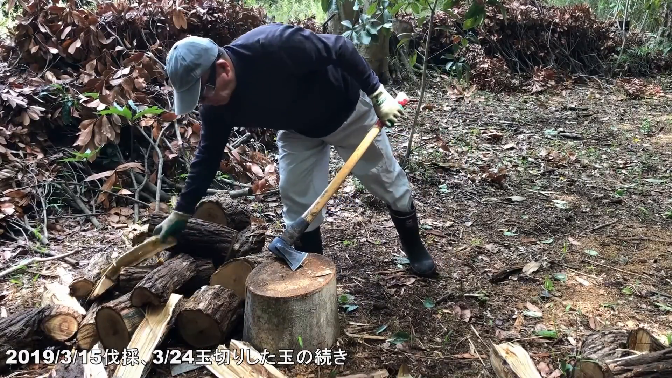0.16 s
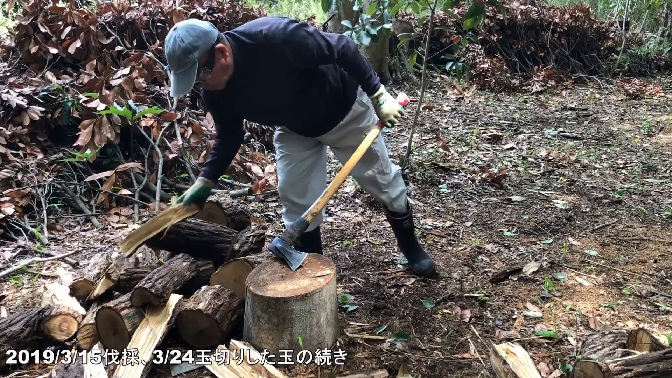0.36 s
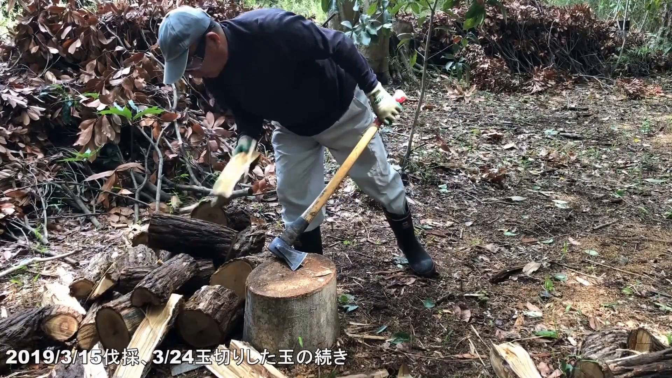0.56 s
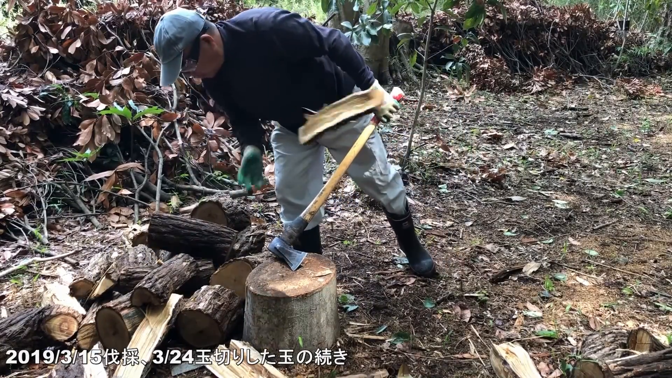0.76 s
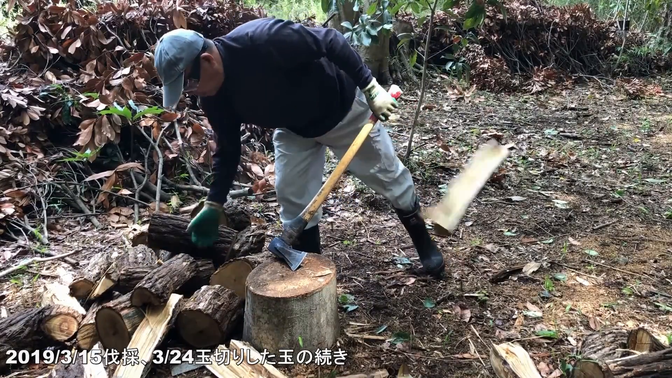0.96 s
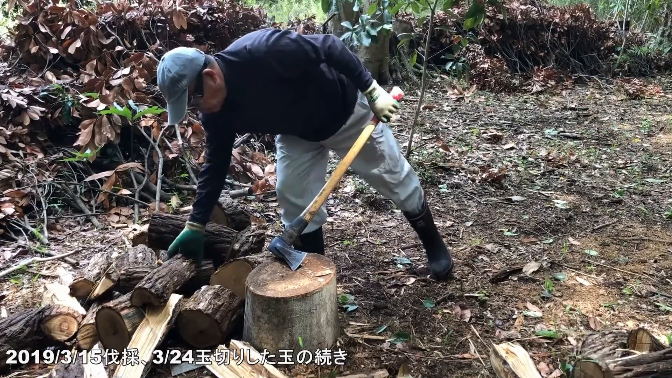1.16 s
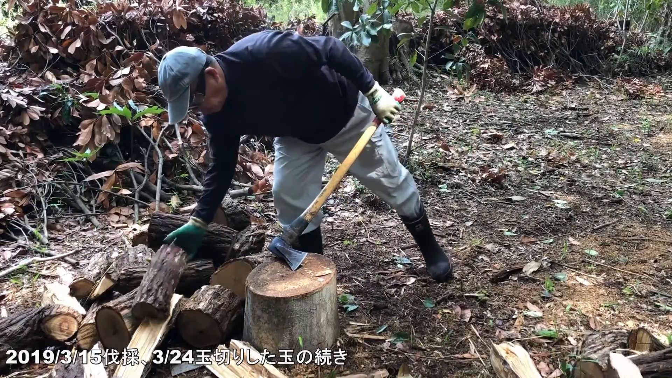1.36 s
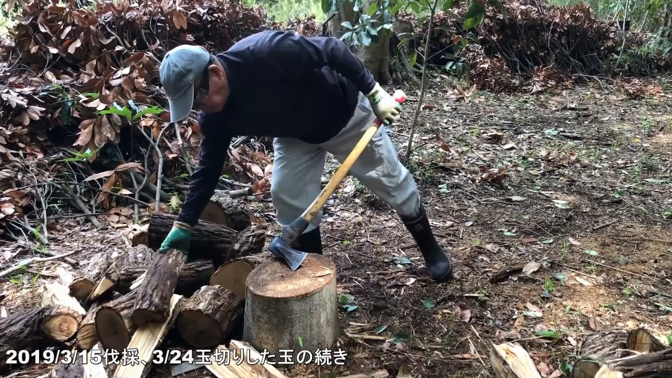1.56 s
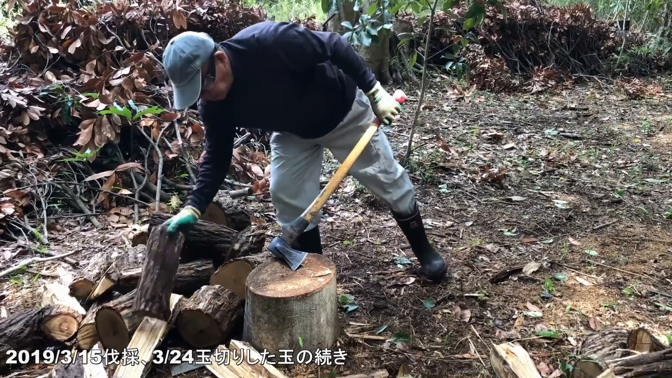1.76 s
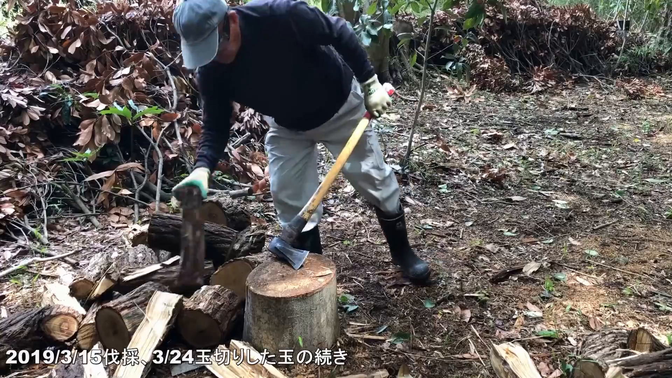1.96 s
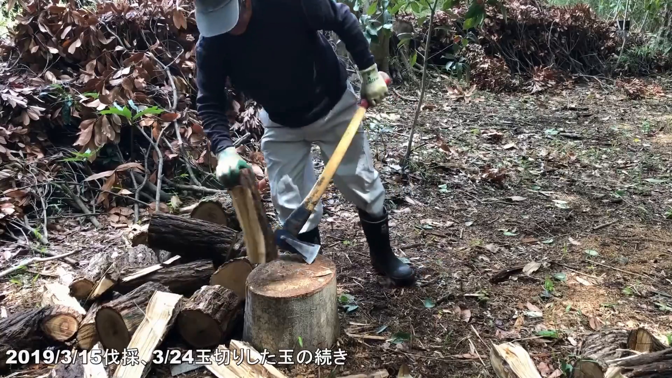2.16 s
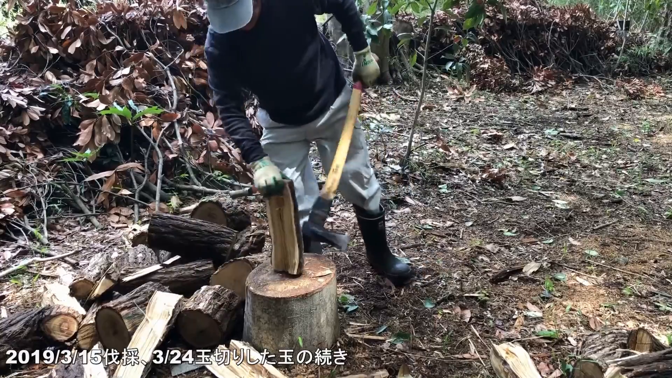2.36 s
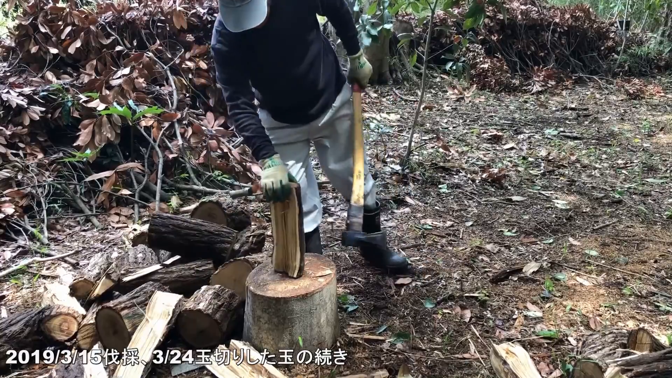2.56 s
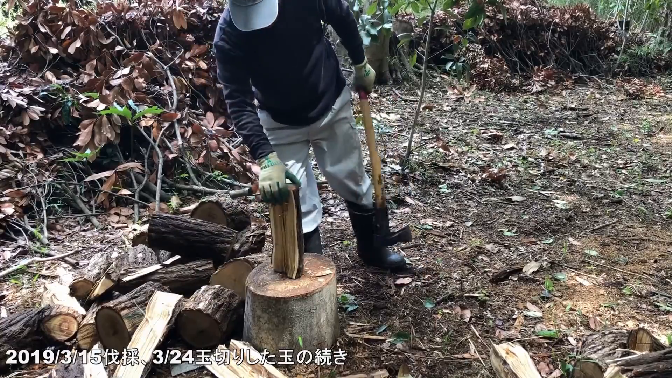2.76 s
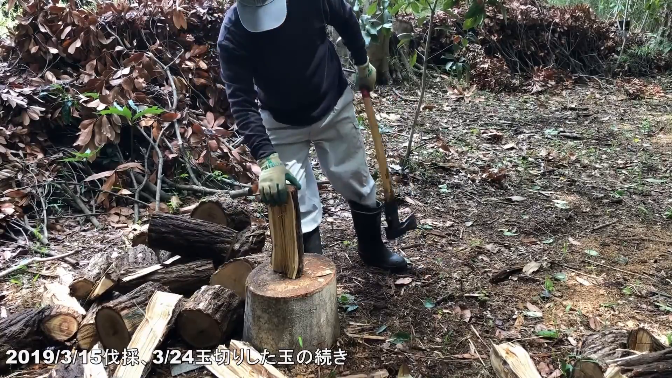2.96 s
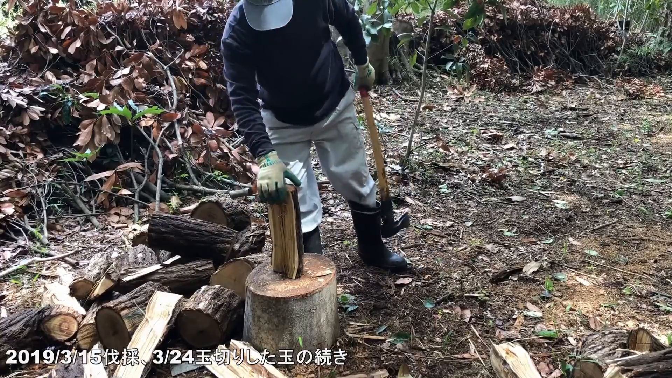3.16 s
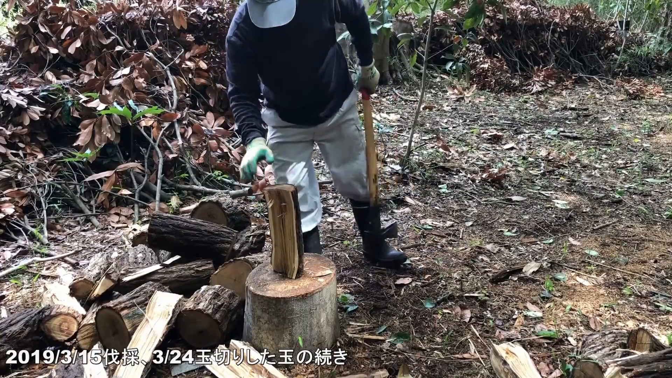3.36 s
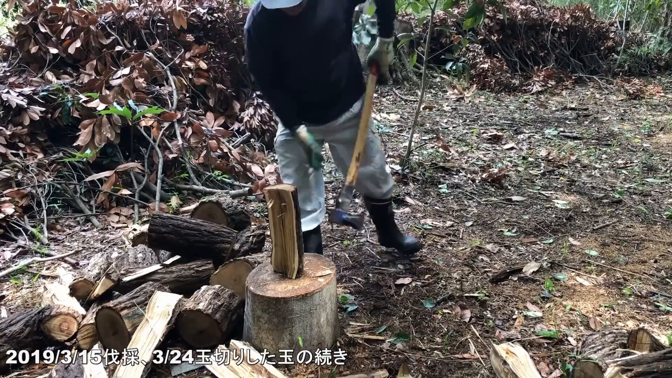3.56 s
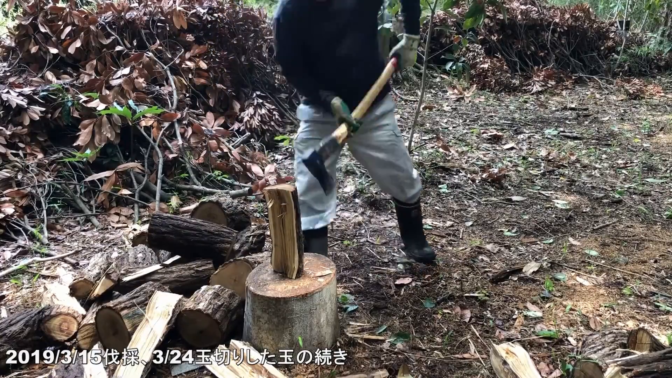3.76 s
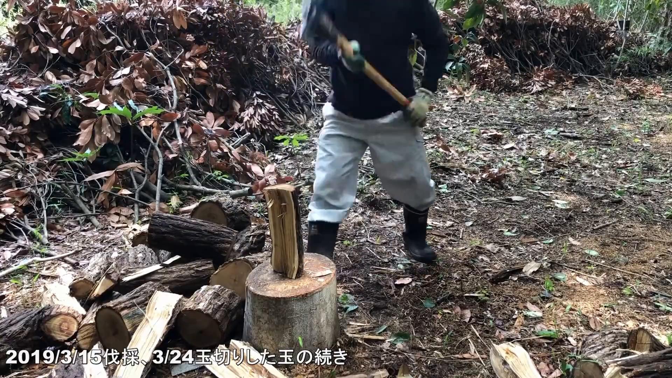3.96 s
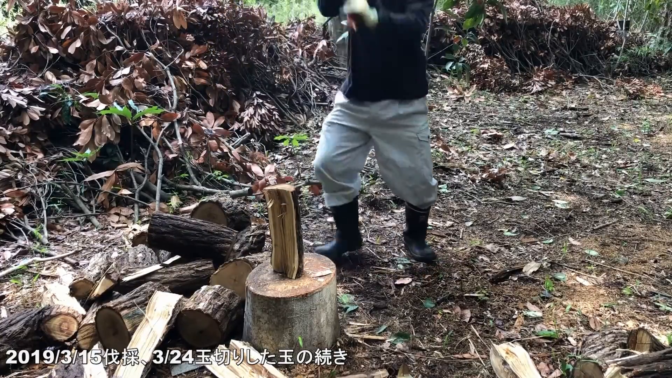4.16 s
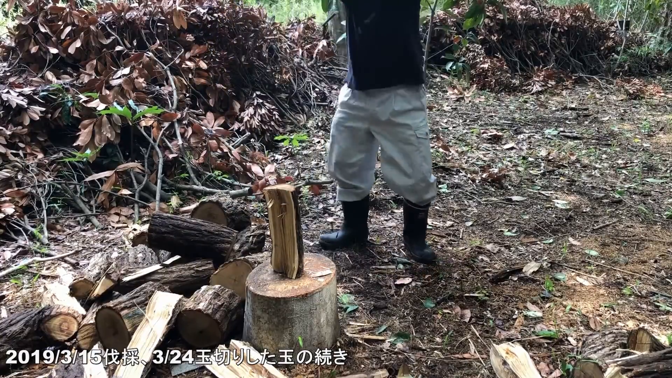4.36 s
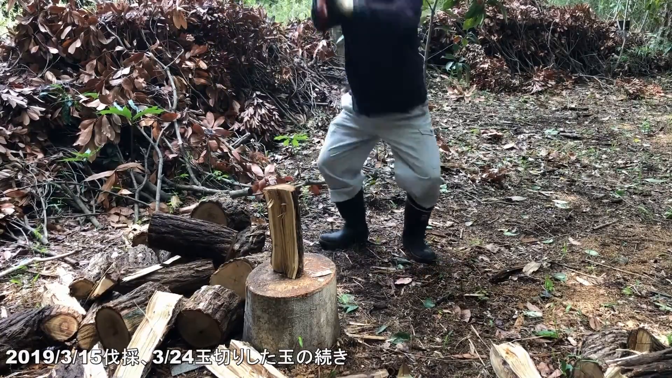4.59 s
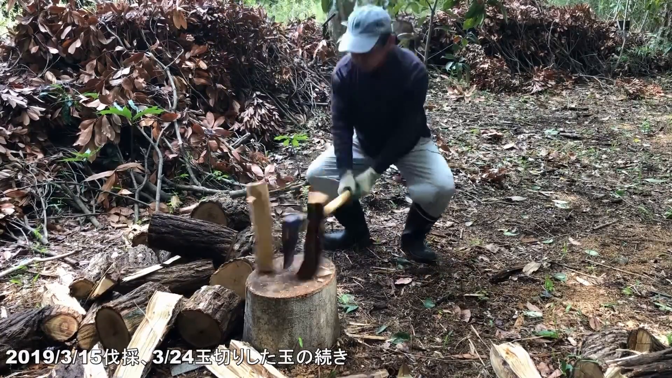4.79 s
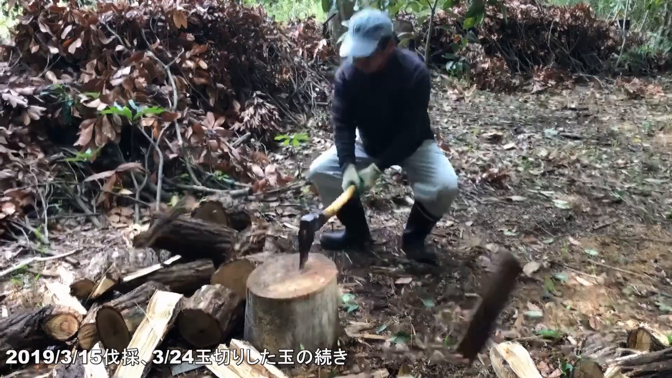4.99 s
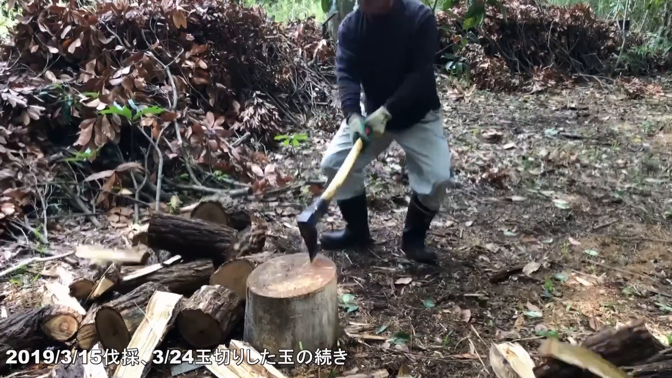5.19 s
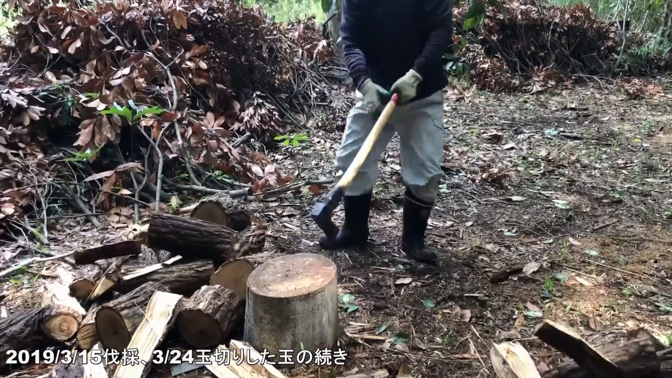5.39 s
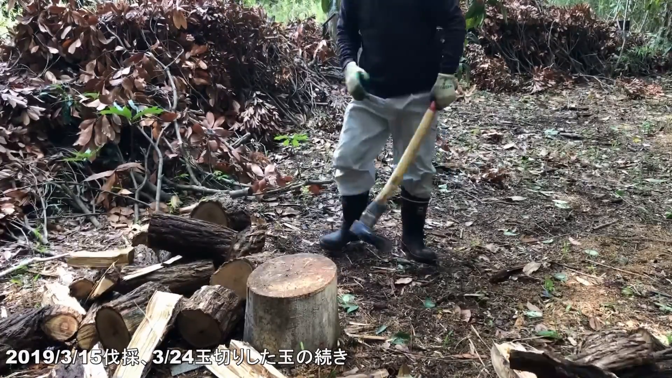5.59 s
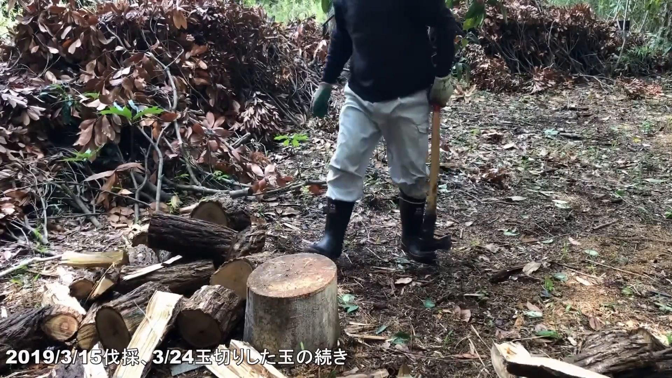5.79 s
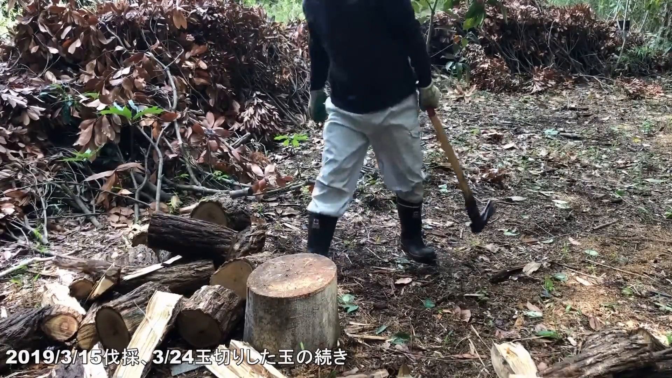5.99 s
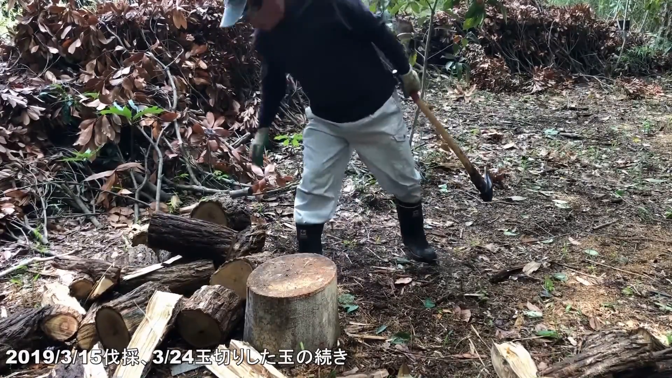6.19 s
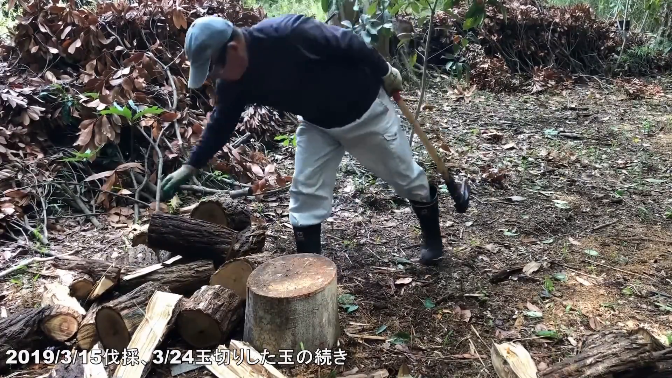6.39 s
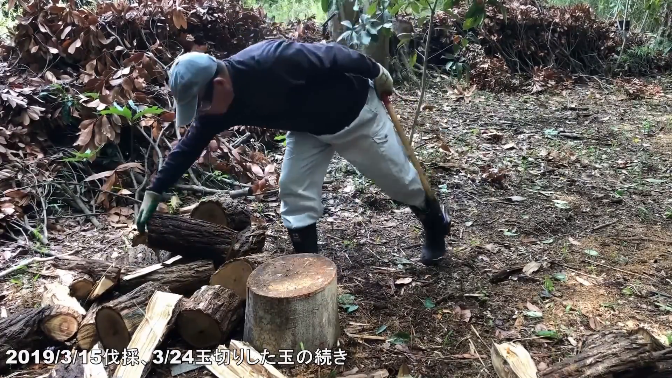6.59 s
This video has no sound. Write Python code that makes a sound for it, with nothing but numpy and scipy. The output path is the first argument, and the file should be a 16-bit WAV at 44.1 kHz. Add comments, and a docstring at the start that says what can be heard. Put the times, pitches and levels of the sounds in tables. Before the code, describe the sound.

Firewood splitting at a wood's edge: wooden clack, quiet handling, a sharp heavy chop with block thump, tumbling pieces, faint birds and engine drone.

```python
"""Firewood at the edge of a wood, a few metres from a phone's microphone. Early on, a tossed billet rings on the pile;
steel rings softly as the axe is pulled from the block, a log is dragged out and stood up, boots rustle in dry leaves.
Near 4.9 s one blow cracks into the end grain, tears fibres and thumps the block; the halves clatter down.
Wood is decaying modes, cracks and clacks are noise in resonances, leaves are filtered snaps and hiss.
Throughout, trees scatter the sound as shaped noise, birds call thinly, and a far engine swells after a slight dip."""
import sys
import numpy as np
from scipy import signal
from scipy.fft import rfft, irfft, next_fast_len
from scipy.io import wavfile
from scipy.ndimage import uniform_filter1d

SR = 44100
rng = np.random.default_rng(int(sys.argv[2]) if len(sys.argv) > 2 else 0)


def file_out(sig):
    """Save sig as 16-bit WAV at sys.argv[1]."""
    # one column per channel
    cols = np.atleast_2d(sig).T
    # limit, then scale
    lim = np.clip(cols, -1, 1)
    pcm = np.round(lim * 32767).astype(np.int16)
    wavfile.write(sys.argv[1], SR, pcm)


N = 292824
TIME = np.arange(N) / SR  # the whole scene [s]
AGE = TIME[:SR // 2]  # time since an event began [s]
TOP_HZ = 16200  # upper limit of the microphone

# ringing of the split log on the block: (frequency [Hz], relative level [dB], t60 [s])
LOG_MODES = [(343, -4, .05), (549, -3.5, 0.025), (856, -11.5, 0.12), (1328, -29.5, 0.35),
             (1197, -11.5, .06), (1275, -7, 0.048), (1340, -5, 0.033), (1781, -3.5, 0.029),
             (1990, -13.5, 0.037), (2690, -11, 0.051), (3230, -6.5, 0.032), (3830, -11, 0.055)]
# blows on the log: (time [s], level [dB], contact corner [Hz], higher is harder)
LOG_BLOWS = [(4.9231, -25, 4030), (4.9486, -8, 2603), (4.9555, -11, 4500), (4.96, -12.5, 1110)]
# the edge entering end grain: (resonance [Hz], width [Hz], relative level [dB])
BITE = [(903, 290, 6), (1723, 340, 7.5), (3500, 290, 0), (5130, 420, 0.5), (6400, 600, -9),
        (7500, 750, -6.5), (10400, 2800, -17), (12760, 6900, -14)]
BITE_S, BITE_DB = 4.9225, -9  # first crack: time and level
# tearing fibres, spectrum shape: (frequency [Hz], relative density [dB per Hz])
TEAR = [(88, -45.5), (150, -15), (383, 2), (2060, -5), (3770, -10.5), (4080, -9.5), (5680, -11.5),
        (8400, -15), (12900, -14.5), (16000, -17)]
TEAR_DB, TEAR_HOLD_S = -21.5, .024  # level, and how long the tearing stays at it

# ringing of the tossed billet: (frequency [Hz], relative level [dB], t60 [s])
BILLET_MODES = [(470, -9, 0.043), (530, -11, .03), (662, -4, 0.022), (778, -3.5, 0.027), (880, 7.5, 0.0099),
                (1079, 0.5, 0.015), (1400, -19, 0.062), (2263, -28, .025), (3390, -15, 0.02006),
                (4540, -16.5, 0.022), (4940, -26, .02)]
# its landing: (time [s], level [dB], contact corner [Hz])
BILLET_BLOWS = [(1.2876, -8.5, 3500)]
# ringing of the pile that the pieces land on: (frequency [Hz], relative level [dB], t60 [s])
PILE_MODES = [(583, 0.5, 0.01), (1172, -1.5, 0.051), (1170, -31, 0.36), (1300, -17.5, 0.061),
              (2307, -11.5, 0.02), (2780, -20, .05), (3860, -10, 0.037), (4270, -3, .035), (5604, -32, .05)]
# blows on the pile: (time [s], level [dB], contact corner [Hz])
PILE_BLOWS = [(1.3042, -19, 1300), (5.2409, -19.5, 9000), (5.249, -10, 1700)]
# handle and steel head as the axe is pulled from the block: (frequency [Hz], relative level [dB], t60 [s])
STEEL_MODES = [(444, 26, .09), (1140, 6, 0.11), (4350, 6, 0.044), (12800, -6, 0.73)]
# the pull: (time [s], level [dB], contact corner [Hz])
STEEL_BLOWS = [(2.305, -66.5, 20060)]

# wood slapping on wood: (resonance [Hz], width [Hz], relative level [dB])
CLACK = [(2210, 1600, 8), (4030, 490, 3.5), (7000, 370, -4.5), (8300, 700, -4.5), (10100, 1100, -11),
         (14300, 2600, -10)]
# hard wood-on-wood contacts: (time [s], level [dB], contact length [s], t60 [s], highest frequency [Hz])
CLACKS = [(1.2884, -33.5, 0.0017, 0.029, 7000), (1.2893, -25, 0.00088, 0.022, 9140),
          (5.211, -28.5, 0.00062, 0.019, 4500), (5.2392, -11.5, 0.0018, 0.016, 12100),
          (5.664, -39.5, .002, .022, 12000), (5.677, -40, .002, .035, 10000)]
# a piece's weight meets block, pile or soil: (time [s], thud level [dB], thud pitch [Hz], bark knock level [dB])
THUDS = [(1.294, -18, 167, -42), (1.312, -28.5, 124, -51), (1.642, -33, 255, -44),
         (1.8356, -22.5, 344, -40.5), (2.426, -31, 344.4, -48), (3.529, -35, 360, -69),
         (4.953, -16.5, 267, -30), (4.959, -7, 145, -32.5), (4.963, -12.5, 62.4, -34.5),
         (5.145, -17, 310, -36), (5.264, -17, 136.4, -31.5), (5.277, -24, 351, -47),
         (5.554, -21.5, 323, -41.5), (5.6, -30.5, 300, -47.5)]
THUD_CYCLES, BARK_HZ = 6.0, 1093  # cycles until a thud is 60 dB down; pitch of the bark's knock
# light knocks of billets and twigs: (time [s], level [dB], pitch [Hz])
KNOCKS = [(0.12, -48.5, 3050), (0.13, -48.5, 3050), (.305, -51, 2330), (.444, -40, 1430), (.738, -43, 2940),
          (1.529, -41.5, 1347), (1.598, -45, 2540), (1.859, -50, 5940), (2.603, -47, 1860),
          (3.56, -51, 1710), (5.648, -46, 1430), (6.259, -49.5, 1460), (6.623, -50.5, 1097)]
# modes of a knock: (ratio to its pitch, relative level [dB])
KNOCK_MODES = [(1, -0.5), (1.27, -6), (1.72, -14)]
# ring time at the reference pitch; smaller pieces stop sooner by this power
KNOCK_T60_S, KNOCK_REF_HZ, KNOCK_DAMPING = .036, 1500, 0.77

# bark crumbs and dry litter crushed by a landing piece: (time [s], level [dB], t60 [s])
CRUNCHES = [(1.2889, -30, 0.056), (1.3, -45, 0.16), (5.243, -31, .09), (5.666, -38.5, 0.12)]
# their spectrum shape: (frequency [Hz], relative density [dB per Hz])
CRUMBS = [(500, -27.0), (2000, 1.5), (8500, -2.0), (11500, -6.5), (16000, -10.5)]
# movements of boot, log or sleeve: (loudest [s], level [dB], rise over 20 dB [s], fall over 20 dB [s],
# share of snapping litter [0-1])
RUSTLES = [(.23, -61, 0.042, .04, .3), (.44, -61.5, 0.16, .06, 0.64), (.735, -62, 0.081, .05, .3),
           (1.535, -48, 0.023, .08, .4), (1.65, -56.5, 0.067, .1, 0.52), (1.73, -57.5, 0.073, .1, 0.65),
           (1.829, -58.5, 0.2, .3, 0.62), (2.22, -67, 0.21, .35, .3), (2.731, -63, .015, .07, .3),
           (3.57, -67.5, .07, .18, .4), (3.9, -72.5, 0.33, 0.4, 0.38), (4.3, -58, 0.23, 0.18, .05),
           (4.375, -54.5, 0.1, .1, 0.053), (4.882, -63.5, 0.171, .05, .02),
           (5.671, -50.5, 0.07, 0.079, 0.63), (5.827, -58.5, .01, .02, .5), (5.97, -66, 0.16, .08, .8),
           (6.126, -56.5, 0.075, .14, .5), (6.28, -65, .15, 0.27, .6), (6.63, -60.5, 0.083, .06, .3)]
# leaves, spectrum shape: (frequency [Hz], relative density [dB per Hz])
LEAVES = [(290, -31), (500, -15.5), (740, -5), (831, -4), (1320, -5.5), (1740, -7.5), (2390, -6.5),
          (5160, -8), (5710, -7), (6420, -10), (11300, -12.5), (16000, -17)]
SNAP_PITCHES_HZ = (1400, 2300, 3400, 4900, 6800, 9300, 13000)
SNAPS_PER_S, SNAP_SPREAD_DB = 130, 3.5  # snaps in each pitch range, and their scatter
FLUTTER_DB, FLUTTER_PER_S = 2.02, 87  # rms unevenness of the rustling, and how often it turns
IDLE_STIR_DB = -81  # litter that never quite lies still
TWIGS_PER_S, TWIG_DB, TWIG_SPREAD_DB, TWIG_HZ = 4, -63, 4, 2400  # mean rate, mid level, +/- range, mid pitch

# distant birds: (time [s], length [s], pitch [Hz], level [dB])
BIRDS = [(0.548, 0.42, 1620, -69), (1.896, 0.43, 7750, -80), (2.551, 0.67, 1760, -78),
         (2.886, 0.13, 4380, -72), (4.206, 0.032, 8100, -67.5), (4.289, 0.016, 5690, -51.5),
         (4.354, 0.039, 5700, -51), (4.559, 0.036, 8000, -70.5), (4.646, 0.035, 9000, -72.5),
         (4.812, 0.19, 1676, -66), (6.267, 0.048, 8870, -64.5), (6.29, 0.04, 7900, -65)]
CALL_FILTER_HZ = 280  # width of each of the two filters that a call passes
# what the trees throw back: (frequency [Hz], level [dB], t60 [s])
TREES = [(100, -28, .8), (450, -27, .8), (850, -28, .8), (1300, -24, .9), (2400, -22, .95),
         (5000, -21.5, .95), (8500, -20, .8), (15000, -25.5, .7)]
# colour of reflections, in mid and in side: (frequency [Hz], relative level [dB])
TRUNK_COLOUR = [(500, -12), (900, -12), (1200, 0), (2400, -3), (8000, -4), (15000, -10)]
SIDE_COLOUR = [(300, -9.5), (1200, -16.5), (14000, 1.5)]
# far engine: (time [s], level [dB])
DRONE = [(0, -71), (.9, -73), (1.4, -59.5), (4.6, -56), (5.9, -49.5), (6.64, -49)]
DRONE_HZ = 85.1  # mean pitch
# open air, spectrum shape: (frequency [Hz], relative density [dB per Hz])
AIR = [(13, -51), (22, -22), (37, -6.5), (87, -1.5), (112, -11), (179, -14.5), (469, -27.5), (910, -35.5),
       (1270, -38), (1760, -42), (2320, -44), (4380, -46.5), (6270, -50), (7810, -50.5), (16000, -54.5)]
AIR_DB = -52.5


def axe():
    """The edge cracks into the end grain, then fibres snap as the split runs on."""
    out = np.zeros(N)
    add(out, BITE_S, undb(BITE_DB) * contact(BITE, fade(0.012, hold=0.002)))
    fibres = unit(colour(crackle(len(AGE), rate=15000, spread_db=0), TEAR))
    add(out, BITE_S + .003, undb(TEAR_DB) * fibres * fade(0.099, hold=TEAR_HOLD_S))
    return out


def struck_modes(modes, blows, size_hz, build_s=0.00037):
    """A piece rings at each blow; soft contacts miss high modes, and small size radiates little below size_hz."""
    out = np.zeros(N)
    for s, level_db, corner_hz in blows:
        ring = np.zeros(len(AGE))
        for hz, db, t60 in modes:
            gain = undb(db) / np.hypot(1, (hz / corner_hz) ** 2)
            ring += gain * fade(t60) * np.sin(2 * np.pi * hz * AGE)
        add(out, s, undb(level_db) * ring * (1 - np.exp(-AGE / build_s)))
    return low_cut(out, size_hz)


def clatter():
    """Bare wood clacks, bark-covered logs knock, and their weight thuds down."""
    out = np.zeros(N)
    for s, db, length, t60, top_hz in CLACKS:
        clack = low_cut(contact(CLACK, fade(t60, hold=length)), 1250, order=3)
        add(out, s, undb(db) * signal.lfilter(*signal.butter(1, top_hz, fs=SR), clack))
    for s, db, hz in KNOCKS:
        add(out, s, undb(db) * knock(hz))
    for s, db, hz, bark_db in THUDS:
        build = 1 - np.exp(-AGE * hz * 2)  # soil yields, so the push builds over part of a cycle
        thud = build * fade(THUD_CYCLES / hz) * np.sin(2 * np.pi * hz * AGE)
        add(out, s, undb(db) * thud + undb(bark_db) * knock(BARK_HZ))
    return out


def knock(hz):
    """Three unevenly spaced modes under the scratch of bark; small pieces ring high and briefly."""
    t60 = KNOCK_T60_S * (KNOCK_REF_HZ / hz) ** KNOCK_DAMPING
    modes = sum(undb(db) * np.sin(2 * np.pi * hz * ratio * AGE) for ratio, db in KNOCK_MODES)
    bark = band(contact([(hz * 0.8, hz, 0)], fade(t60, hold=0.0025)), hz, hz * 3)
    return (fade(t60) * modes + undb(-8) * bark) * (1 - np.exp(-AGE / .0006))


def crunch():
    """Litter snaps under a landing and goes on settling for a moment."""
    out = np.zeros(N)
    for s, db, t60 in CRUNCHES:
        snaps = colour(crackle(len(AGE), rate=10000, spread_db=6.0), CRUMBS)
        add(out, s, undb(db) * unit(snaps) * fade(t60))
    return out


def leaves():
    """Movements swell and die away: litter snaps in several pitch ranges, sleeves swish smoothly."""
    litter_power = np.full(N, undb(IDLE_STIR_DB) ** 2)
    cloth_power = np.zeros(N)
    for s, db, rise, fall, share in RUSTLES:
        drop_db = 20 * np.maximum((s - TIME) / rise, (TIME - s) / fall)
        power = undb(db - drop_db) ** 2
        litter_power += share * power
        cloth_power += (1 - share) * power
    snaps = np.zeros(N)
    for hz in SNAP_PITCHES_HZ:
        snaps += band(crackle(N, rate=SNAPS_PER_S, spread_db=SNAP_SPREAD_DB), hz, 350 + hz / 5)
    litter = np.sqrt(litter_power) * unit(colour(snaps, LEAVES))
    cloth = np.sqrt(cloth_power) * unit(colour(rng.standard_normal(N), LEAVES))
    return (litter + cloth) * undb(FLUTTER_DB * walk(FLUTTER_PER_S))


def twigs():
    """Stray twigs tick at random moments, each within an octave of the mid pitch."""
    out = np.zeros(N)
    for when, size, octaves in rng.uniform(-1, 1, (int(TWIGS_PER_S * N / SR), 3)):
        tick = undb(TWIG_DB + TWIG_SPREAD_DB * size) * knock(TWIG_HZ * 2 ** octaves)
        add(out, (when + 1) / 2 * TIME[-1], tick)
    return out


def birds():
    """Thin calls from far away, each smeared into a narrow noise band by the trees."""
    out = np.zeros(N)
    for s, length, hz, db in BIRDS:
        size = int(length * SR)
        call = band(band(rng.standard_normal(size), hz, CALL_FILTER_HZ), hz, CALL_FILTER_HZ)
        add(out, s, undb(db) * np.hanning(size) * unit(call))
    return out


def echoes(x, db, t60, spectrum):
    """Separate reflections off trunks and ground keep the pitch of the wood."""
    arrivals = crackle(len(AGE), rate=2900, spread_db=5.0) * fade(t60) * (1 - np.exp(-AGE / 0.0041))
    response = colour(arrivals, spectrum)
    return undb(db) * signal.fftconvolve(x, response / np.linalg.norm(response))[:N]


def trees(x, pile_db, pile_t60, echo_s, echo_db):
    """Each band scatters into a noise wash: quickly off the woodpile, slowly from the wood's edge."""
    t, out = TIME[:SR], np.zeros(N)
    points, dbs, t60s = np.transpose(TREES)
    # echo_db bends the wash's level around echo_s
    swell = (1 - np.exp(-t / 0.014)) * undb(echo_db * np.exp(-((t - echo_s) / .035) ** 2))
    pile = (np.exp(-np.log(1000) * t / pile_t60) * (1 - np.exp(-t / 0.0097))) ** 2
    for (hz, direct), (_, noise) in zip(split(x), split(rng.standard_normal(N))):
        db = np.interp(np.log(hz), np.log(points), dbs)
        t60 = np.interp(np.log(hz), np.log(points), t60s)
        wood_edge = (swell * np.exp(-np.log(1000) * t / t60)) ** 2
        spread = wood_edge / wood_edge.sum() + undb(pile_db) ** 2 * pile / pile.sum()
        power = signal.fftconvolve(direct ** 2, spread)[:N]
        out += undb(db) * np.sqrt(np.maximum(power, 0)) * unit(noise)
    return out


def distance():
    """A far engine, two wavering harmonics, drones over the low rumble and soft hiss of open air."""
    phase = 2 * np.pi * np.cumsum(DRONE_HZ * (1 + .006 * walk(2.7))) / SR
    tone = unit(np.sin(phase) + undb(-13.5) * np.sin(2 * phase))
    engine = tone * undb(np.interp(TIME, *np.transpose(DRONE)) + 1.5 * walk(6))
    air = unit(colour(rng.standard_normal(N), AIR)) * undb(AIR_DB + .5 * walk(4.5))
    return engine + air


def contact(resonances, envelope):
    """Crushing surfaces shake broad resonances with noise for as long as they touch."""
    push = rng.choice([-1, 1], len(AGE)) * envelope
    x = sum(undb(db) * band(push, hz, width) for hz, width, db in resonances)
    return unit(x) * np.sqrt(np.mean(envelope ** 2))


def crackle(size, rate, spread_db):
    """Random tiny snaps at rms 1; a wider spread makes a few much louder than the rest."""
    strength = undb(spread_db * np.minimum(rng.exponential(size=size), 4))
    return unit((rng.random(size) < rate / SR) * strength * rng.standard_normal(size))


def fade(t60, hold=0):
    """Stay level for the hold, then die away by 60 dB in t60."""
    return np.exp(-np.log(1000) * np.maximum(AGE - hold, 0) / t60)


def walk(rate):
    """Smooth random wander of rms 1, with rate new targets a second."""
    k = int(SR / rate)
    return unit(uniform_filter1d(np.repeat(rng.standard_normal(N // k + 1), k)[:N], k))


def band(x, hz, width):
    """One resonance, gain 1 at its centre."""
    k = np.sin(2 * np.pi * hz / SR) * width / hz / 2
    return signal.lfilter([k, 0, -k], [1 + k, -2 * np.cos(2 * np.pi * hz / SR), 1 - k], x)


def colour(x, spectrum):
    """Filter by (frequency [Hz], level [dB]) points on a log-frequency axis."""
    hz, db = np.transpose(spectrum)
    f = np.maximum(np.fft.rfftfreq(len(x), 1 / SR), 1)
    return irfft(rfft(x) * undb(np.interp(np.log(f), np.log(hz), db)), len(x))


def split(x, count=20):
    """Overlapping bands a third-octave apart, as (Hz, signal); the end bands take the rest, so they sum to x."""
    centres = np.geomspace(200, 16000, count)
    size = next_fast_len(N)
    f, spectrum = np.fft.rfftfreq(size, 1 / SR), rfft(x, size)
    bands = []
    for hz in centres:
        weight = np.interp(f, centres, 1. * (centres == hz))
        bands.append((hz, irfft(spectrum * weight, size)[:N]))
    return bands


def low_cut(x, hz, order=2):
    """Drop the bass below hz."""
    return signal.sosfilt(signal.butter(order, hz, "high", fs=SR, output="sos"), x)


def undb(db):
    """Decibels to gain."""
    return 10 ** (np.asarray(db) / 20)


def unit(x):
    """Scale to rms 1."""
    return x / np.sqrt(np.mean(x ** 2))


def add(out, s, x):
    """Mix x into out from time s."""
    i = int(s * SR)
    out[i:i + len(x)] += x[:len(out) - i]


def scene():
    """Nearly all straight ahead: the billet lies slightly right, and some reflections differ between the ears."""
    chop = axe() + struck_modes(LOG_MODES, LOG_BLOWS, size_hz=260)
    billet = struck_modes(BILLET_MODES, BILLET_BLOWS, size_hz=300, build_s=0.00066)
    pile = struck_modes(PILE_MODES, PILE_BLOWS, size_hz=450, build_s=0.00057)
    loud = chop + billet + pile + clatter()
    small = struck_modes(STEEL_MODES, STEEL_BLOWS, size_hz=600) + crunch() + leaves() + twigs() + birds()
    wash = trees(loud + small, pile_db=5.5, pile_t60=0.29, echo_s=0.1, echo_db=-2.0)
    trunks = echoes(loud, db=-28, t60=.8, spectrum=TRUNK_COLOUR)
    mid = loud + small + wash + trunks + distance()
    side = echoes(loud, db=-20, t60=.05, spectrum=SIDE_COLOUR) - undb(-26.5) * billet
    return np.array([mid + side, mid - side])


def record(dry):
    """The phone drops the deepest rumble, rounds the highest peaks and cuts the top."""
    rounded = np.tanh(.6 * low_cut(dry, 35, order=4)) / .6
    return signal.sosfilt(signal.ellip(10, .2, 70, TOP_HZ, fs=SR, output="sos"), rounded)


dry = scene()
out = record(dry)
file_out(out)
```